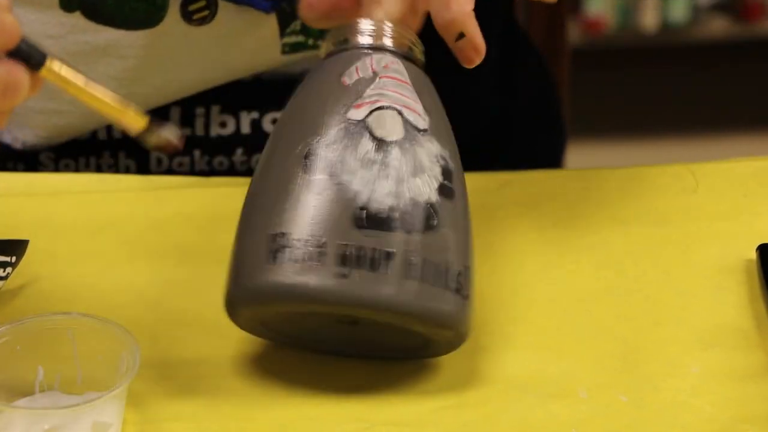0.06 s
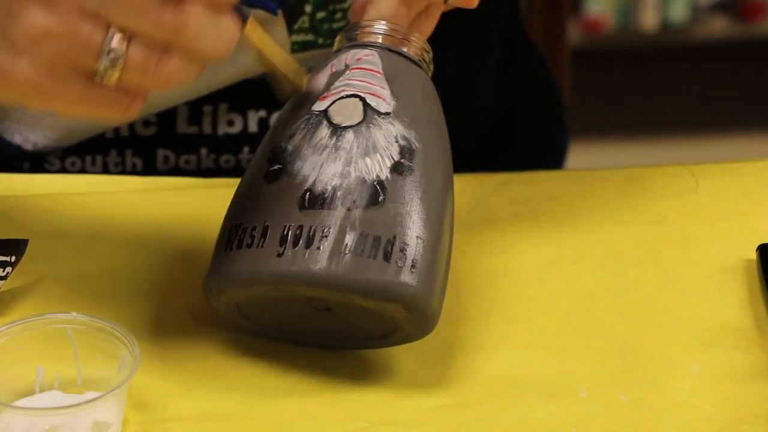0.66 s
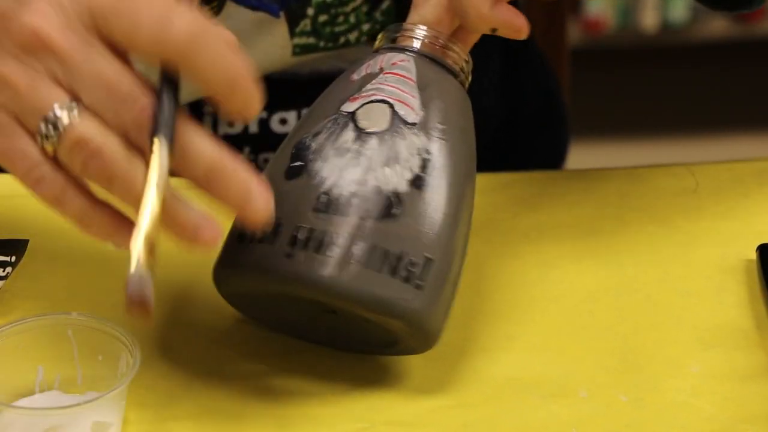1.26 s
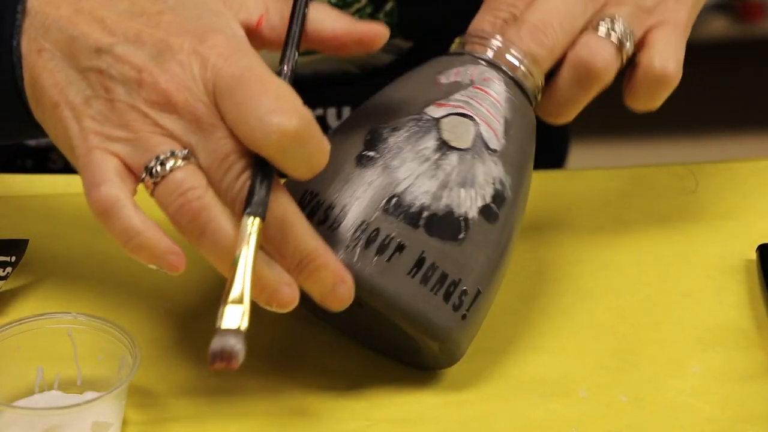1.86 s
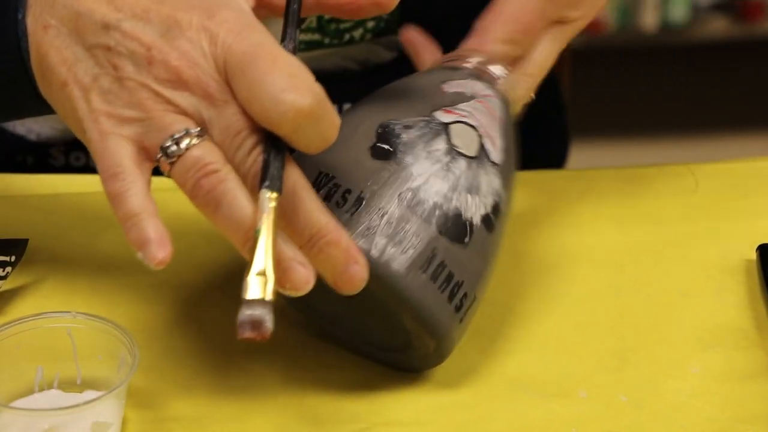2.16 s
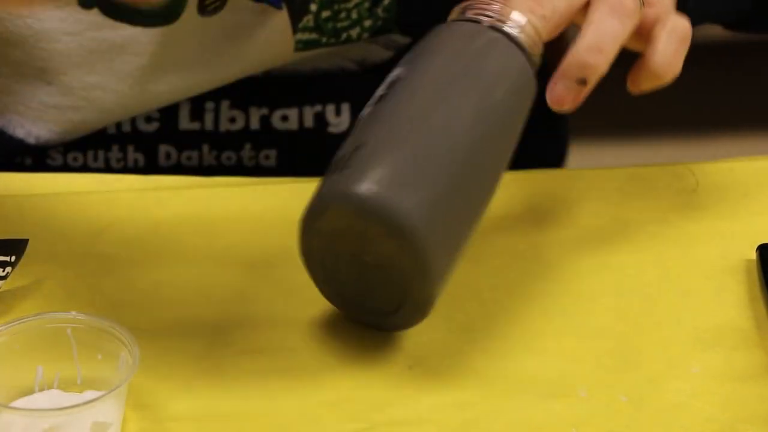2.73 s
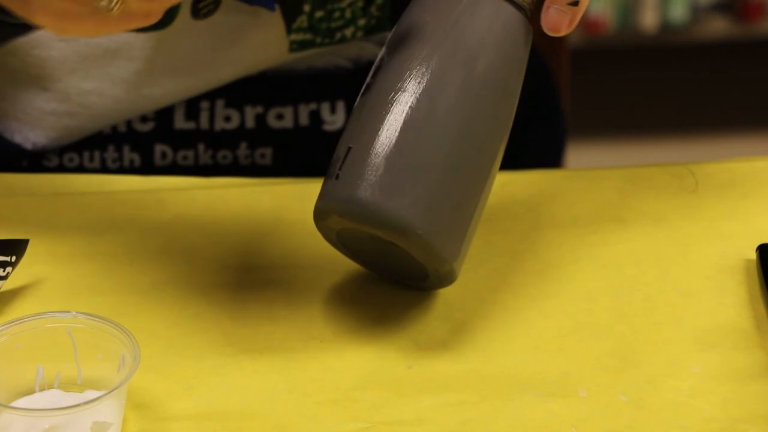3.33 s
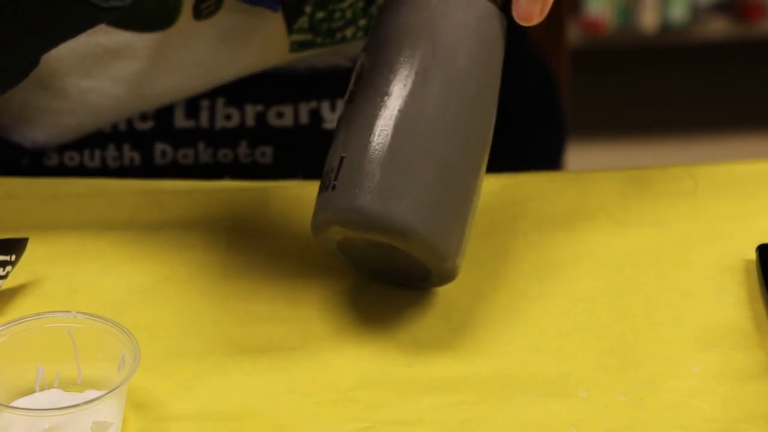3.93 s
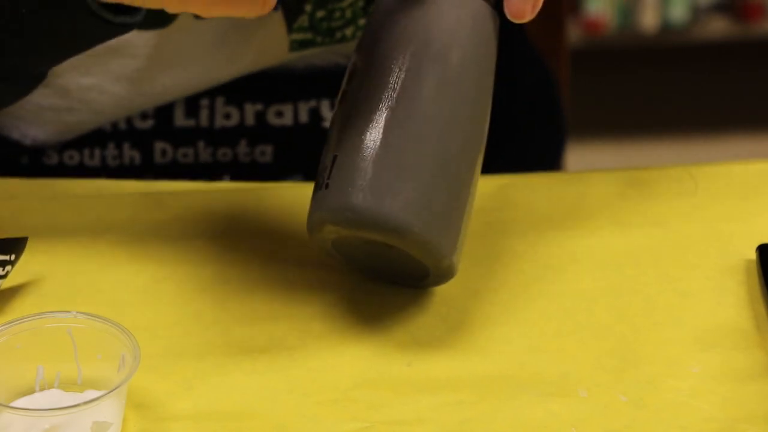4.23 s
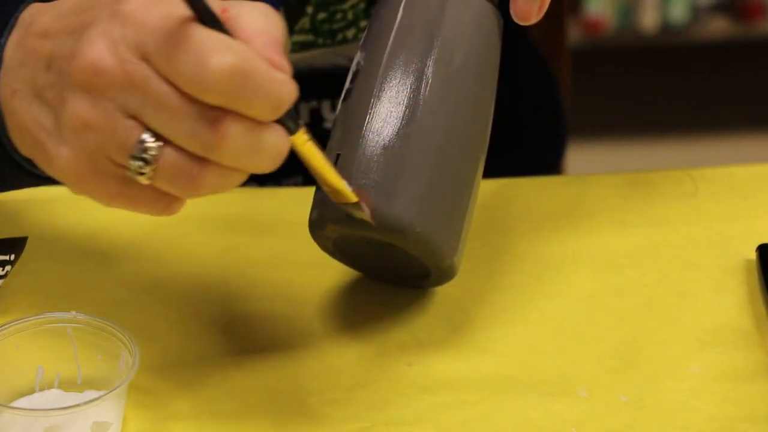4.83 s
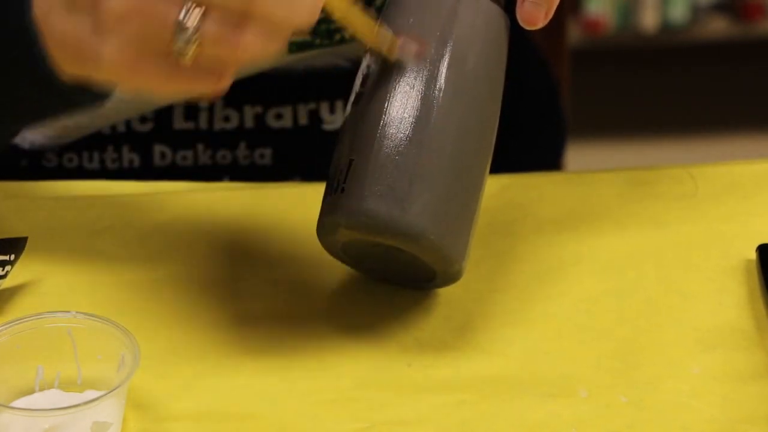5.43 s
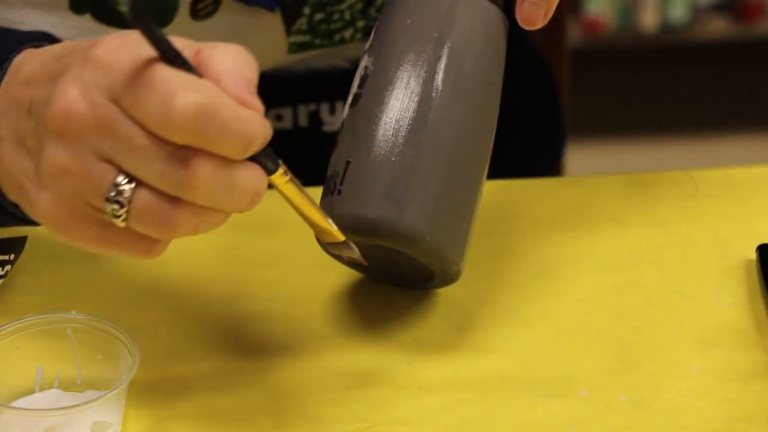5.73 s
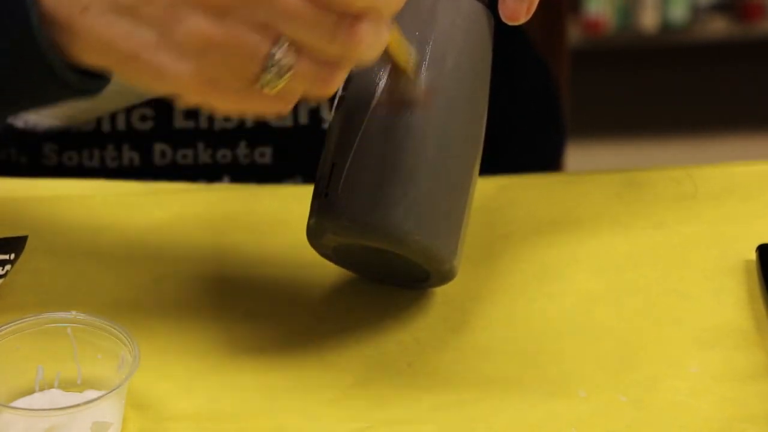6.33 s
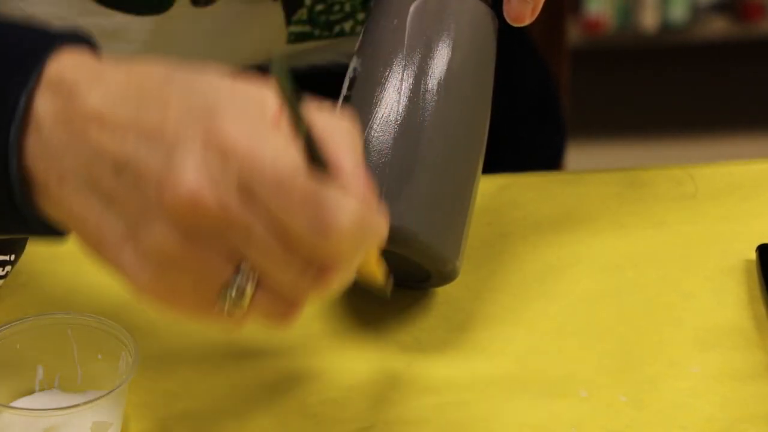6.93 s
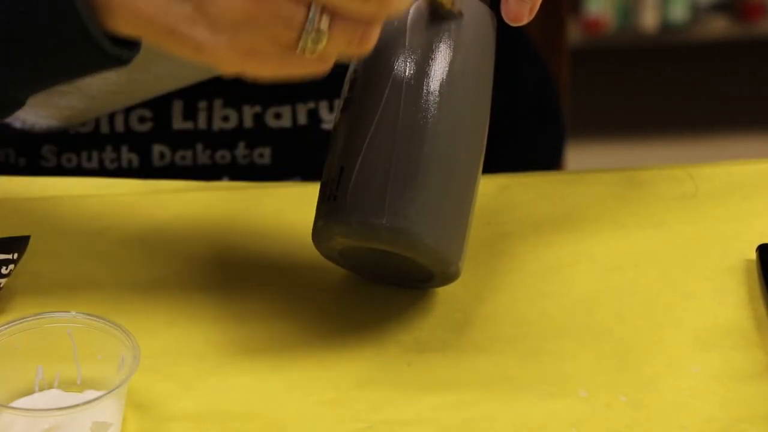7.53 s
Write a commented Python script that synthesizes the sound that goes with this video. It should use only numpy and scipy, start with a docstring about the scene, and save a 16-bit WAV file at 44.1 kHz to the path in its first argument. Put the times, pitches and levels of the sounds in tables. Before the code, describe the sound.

A glass bottle is set down on a paper-covered table with a short, ringing knock. Small ticks touch the glass, the bottle scrapes on the paper, and it is set down twice more. Then a wet brush strokes the glass with a soft hiss, while rougher cloth rubs and snags now and then. It all sounds close, in a quiet room with a low hum and a faint flutter.

```python
"""A quiet room hums throughout, and a small mechanism flutters in it. First a painted glass bottle is
set down on a paper-covered table, making the top ring. Small hard things tick on the glass, and a soft
brush gives two short strokes. The bottle pivots on its heel, scraping the paper, and is set down twice
more. Then the brush strokes on varnish, its bristles hissing over the glass, while a rougher rubbing
of cloth comes and goes, snagging as the arm reaches across."""
import sys
import numpy as np
from scipy import signal
from scipy.fft import rfft, irfft, next_fast_len
from scipy.io import wavfile
from scipy.ndimage import uniform_filter1d, map_coordinates

SR = 44100
rng = np.random.default_rng(int(sys.argv[2]) if len(sys.argv) > 2 else 0)


def generate_wav(signal):
    """Clip the signal to [-1, 1] and save it as 16-bit WAV at the path in sys.argv[1]."""
    frames = np.transpose(np.atleast_2d(signal))
    scaled = np.clip(frames, -1, 1) * 32767
    pcm = np.round(scaled).astype(np.int16)
    wavfile.write(sys.argv[1], SR, pcm)


N = 338989
TIME = np.arange(N) / SR

# The tone colour of each noise. Each row: frequency in Hz, relative level in dB.
AIR_COLOUR = [(15, -32.5), (25, -22), (53, 0.5), (87, -6), (120, -1.5), (200, -5.5), (326, -7.5),
              (516, -13), (607, -8), (677, -12.5), (2110, -21.5), (2550, -21.5), (4870, -25), (9840, -28),
              (16000, -36)]
PAPER_COLOUR = [(900, 0.5), (1800, -4), (2550, -2), (2950, -1.5), (3550, 3.5), (4000, -0.5), (4500, -3),
                (5500, -3), (6400, -5), (7600, -3), (8800, -5), (10000, -10), (13000, -18), (16000, -29)]
BRISTLE_COLOUR = [(300, 1.5), (800, -2), (1300, -6), (1950, 1.5), (2500, -1.5), (3400, 0), (4700, 0.5),
                  (7300, -0.5), (9500, -2), (11500, -7), (13500, -9), (16000, -25)]
SHEEN_COLOUR = [(2000, -18), (5000, -12), (7000, 2), (9500, -6), (11500, -9), (13500, -9), (16000, -17)]   # the bright hiss of the bristle tips
CLOTH_COLOUR = [(150, -9), (400, -5), (780, 2.5), (1400, 3), (1900, -5.5), (2600, -3), (5000, -7),
                (16000, -21)]
SNAG_COLOUR = [(200, -2), (800, 2), (1500, -0.5), (2000, -2), (3000, -3.5), (5000, -1), (9500, -11),
               (13000, -37), (16000, -50)]
# How alike the two ears' noise is. Each row: frequency in Hz, likeness (1 means the same).
ROOM_LIKENESS = [(50, 0.96), (300, 0.76), (700, 0.46), (2000, 0.077), (8000, 0.034)]
CLOSE_LIKENESS = [(200, 1), (1000, 1), (4000, 0.76), (12000, 0.29)]
# The room's hum. Each row: pitch in Hz, level in dB.
HUM_TONES = [(56, -65), (119, -59.5), (157, -66)]
# The bottle knocks on the table. Each row: start in seconds, ring level in dB, ring brightness in dB
# per octave, then the levels of the crack, glassy tick, crunch and boom in dB. All levels are relative.
BOTTLE_KNOCKS = [(0.09, -13.5, 2.8, -16, -26.5, -31.5, -14.5), (0.1187, -18.5, -3, -22, -42, -38, -26),
                 (1.8676, -39.5, -7, -38, -26, -43, -52), (2.8112, -25.5, -1.5, -35, -32, -37, -17),
                 (3.16, -16, -2, -48, -25, -31.5, -14)]
# The tones things ring with. Each row: pitch in Hz, relative level in dB, fade time in seconds.
# A fade time (t60) is how long a sound takes to drop by 60 dB.
TABLE_TONES = [(248, -27, 1), (270, -62, 0.13), (340, -37, 0.23), (316.3, 2, 0.17), (334, -4, 0.21),
               (366, -17.5, 0.5), (432, -14, 0.2), (506, -8.5, 0.089), (568, -11.5, 0.075),
               (614, -12, 0.069), (658, -12.5, 0.096), (719, -8, 0.091), (748, -7, 0.13),
               (761, -21.5, 0.16), (824, -42, .13), (925, -40, 0.11), (970, -24, 0.11), (1090, -30, 0.094),
               (1270, -50, 0.045), (1437, -20.5, 0.072), (2533, -18, 0.034)]   # the table top with the bottle on it
FRAME_TONES = [(120.8, -22.5, 0.35), (158.7, -16.5, 0.2)]   # the deep boom of the table frame
GLASS_TONES = [(1950, -3, .025), (2520, 2, 0.037), (3510, 0, 0.027), (4420, 2, 0.026), (6100, -3, .012),
               (7600, 2, .01)]   # the bottle's wall, damped by the hand
# The room's echo. Each row: frequency in Hz, level in dB, fade time in seconds.
ROOM_ECHO = [(146, -3.5, 0.58), (346, -10, 0.37), (800, -8, 0.4), (2500, -9.5, 0.25), (6000, -11, 0.097),
             (14000, -13, 0.15)]
# Small hard things touch the glass. Each row: start in seconds, relative level in dB, lowest and
# highest frequency in Hz, fade time in seconds.
GLASS_TICKS = [(0.3999, -30.5, 4800, 10600, 0.0083), (1.402, -30, 8000, 13800, 0.012),
               (1.8677, -28, 6260, 9400, 0.011), (2.84, -47, 6500, 10500, 0.062),
               (2.849, -45, 6430, 10500, 0.026)]
# Movements. Each row: start, time speeding up and time slowing down in seconds, then two relative
# levels in dB, for the two sounds named beside the table.
HEEL_DRAGS = [(.47, 0.051, 0.037, -64, -48), (1.32, 0.05, 0.034, -57.5, -46.5),
              (1.895, 0.084, .09, -43.5, -41.5), (1.993, 0.017, 0.044, -59, -44),
              (2.08, 0.06, 0.035, -52, -50), (2.15, 0.032, .1, -53, -51.5),
              (2.25, 0.076, 0.056, -54, -44.5), (2.36, 0.048, .26, -64, -63)]   # paper scrape, table drone
BRUSH_STROKES = [(.66, 0.098, 0.083, -60.5, -68), (.82, 0.057, 0.18, -64, -67), (3.40, .06, 0.15, -56, -62),
                 (3.54, 0.17, 0.49, -62.5, -72), (3.84, 0.47, 0.19, -52, -59),
                 (4.40, .22, 0.31, -50.5, -55.5), (4.99, 0.045, 0.13, -57, -68),
                 (5.25, 0.41, .28, -55, -60), (5.74, 0.14, 0.16, -55.5, -67), (6.02, .03, 0.24, -53.5, -66),
                 (6.17, 0.16, 0.21, -52.5, -60), (6.68, 0.23, 0.074, -45.5, -48.5),
                 (7.59, 0.047, .12, -56, -68)]   # bristle hiss, sheen
CLOTH_RUBS = [(3.88, 0.2, .3, -54, -65), (5.8, 0.16, 0.091, -57.5, -48.5), (6.015, 0.014, 0.44, -48.5, -46),
              (6.28, 0.074, 0.059, -45, -44)]   # cloth hiss, table drone
# Tacky varnish makes the bristles catch. Each row: time in seconds, roughness in dB.
TACKINESS = [(3.8, 2), (4.0, 4), (4.35, 5), (4.5, 0.8)]
# The brush moves along the bottle. Each row: time in seconds, echo strength, lean to the left in dB.
BRUSH_PATH = [(4.2, .02, 5.5), (4.6, .05, 1.4), (6.0, .03, 3), (6.7, .33, 0.1)]
# The cloth snags and lets go. Each row: start in seconds, relative burst level in dB, the burst's fade
# time in seconds, relative snap level in dB.
CLOTH_SNAGS = [(3.984, -47, 0.09, -46), (4.086, -49, .03, -42.5), (4.145, -42.5, 0.022, -44),
               (4.188, -45, 0.019, -49), (4.208, -38, 0.037, -38), (4.238, -43.5, 0.043, -35.5),
               (4.282, -40.5, 0.14, -36), (4.347, -57, 0.044, -40), (5.862, -46, .03, -58),
               (5.932, -41, 0.033, -46), (5.989, -45, .025, -50), (6.024, -40, 0.12, -56),
               (6.032, -39, 0.03, -39), (6.339, -27, 0.099, -28), (6.495, -42, 0.025, -51),
               (6.525, -44.5, 0.032, -58)]


def from_db(db):
    """Turn decibels into a number to multiply a sound by."""
    return np.exp(np.asarray(db) * np.log(10) / 20)


def rms_one(x):
    """Scale a sound to an average power of 1."""
    return x / np.sqrt(np.mean(x ** 2) + 1e-20)


def at_hz(table, hz, column=1):
    """Look up a frequency in a table, gliding between rows on a scale of octaves."""
    table = np.array(table)
    return np.interp(np.log(np.maximum(hz, 1)), np.log(table[:, 0]), table[:, column])


def drift(rate):
    """A random wobble of size about 1 that turns about rate times a second."""
    points = rng.standard_normal(int(N / SR * rate) + 2)
    return rms_one(np.interp(TIME * rate, np.arange(len(points)), points))


def band(x, low_hz, high_hz, order=2):
    """Keep what lies between two frequencies; a higher order cuts more sharply."""
    return signal.sosfilt(signal.butter(order, [low_hz, high_hz], "band", fs=SR, output="sos"), x)


def panned(x, left_db):
    """Make the left side louder than the right by left_db."""
    return x * from_db(np.array([[left_db], [-left_db]]) / 2)


def stereo(mid, side):
    """Make left and right from what they share (mid) and what sets them apart (side)."""
    return mid + side * [[1], [-1]]


def delayed(x, ms):
    """Play one channel ms milliseconds late, or early if ms is negative."""
    return map_coordinates(x, [np.arange(N) - ms * SR / 1000], order=3)


def delay_right(x, ms):
    """Shift only the right ear's sound in time."""
    return np.array([x[0], delayed(x[1], ms)])


def add(out, start_s, sound):
    """Mix a short sound in at start_s."""
    start = round(start_s * SR)
    out[..., start:start + sound.shape[-1]] += sound[..., :N - start]


def hiss(colour, likeness, grain=1.):
    """Stereo noise, roughened by grain (a fast flicker in level) and then given its colour."""
    size = next_fast_len(N)
    hz = np.fft.rfftfreq(size, 1 / SR)
    noise = rng.standard_normal((2, N)) * grain
    mid, side = rfft(noise, size) * from_db(at_hz(colour, hz)) * (hz > 20)
    alike = at_hz(likeness, hz)
    spectrum = stereo(np.sqrt(1 + alike) * mid, np.sqrt(1 - alike) * side)
    return rms_one(irfft(spectrum, size)[:, :N])


def gesture(moves, curve, column=3):
    """Loudness of movements that speed up and come to rest: it follows speed to the power curve."""
    power = np.zeros(N)
    for move in moves:
        start, rise, fall = move[:3]
        inside = slice(*np.searchsorted(TIME, [start, start + rise + fall]))
        angle = np.interp(TIME[inside] - start, [0, rise, rise + fall], [0, np.pi / 2, np.pi])
        speed = np.abs(np.sin(angle))
        power[inside] += (from_db(move[column]) * speed ** curve) ** 2
    return np.sqrt(power)


def air_and_hum():
    """Moving air hisses softly under a low, wavering hum."""
    out = from_db(-51.16) * hiss(AIR_COLOUR, ROOM_LIKENESS)
    for hz, db in HUM_TONES:
        level = from_db(db + 2.0 * drift(rate=2.7))
        out += level * np.sin(2 * np.pi * hz * TIME + 0.71 * drift(rate=6))
    return out


def flutter(per_second=11.0, pitch_hz=605, level_db=-50.5, spread_db=2.4, width_s=0.0042):
    """A small mechanism gives faint, nearly regular pips, each with its own strength and pitch."""
    out, t = np.zeros(N), TIME[:SR // 20]
    swell = np.exp(-.5 * ((t - t.mean()) / width_s) ** 2)
    count = int((N / SR - .1) * per_second)
    for k, (late, strength, detune) in enumerate(rng.standard_normal((count, 3))):
        pip = swell * np.sin(2 * np.pi * pitch_hz * (1 + 0.024 * detune) * t)
        add(out, abs(k / per_second + 0.00306 * late), from_db(level_db + spread_db * strength) * pip)
    return out


def struck(tones, tilt_db=0):
    """One tap sets off fading tones; a positive tilt_db (per octave) favours the high ones."""
    hz, db, t60 = np.array(tones).T[:, :, None]
    t = TIME[:SR // 2]
    level = from_db(db + tilt_db * np.log2(hz / 320))
    return np.sum(level * from_db(-60 * t / t60) * np.sin(2 * np.pi * hz * t), axis=0)


def crack(low_hz, high_hz, t60, width, order=1):
    """Tiny fractures at a contact give a short burst of noise; width spreads it between the ears."""
    t = TIME[:SR // 5]
    mid, side = rng.standard_normal((2, len(t)))
    fade = from_db(-60 * t / t60)
    burst = band(stereo(mid, width * side) * fade, low_hz, high_hz, order)
    return rms_one(burst) * np.sqrt(np.mean(fade ** 2))


def knocks():
    """The bottle cracks and crunches where it lands, rings the table top and makes the frame boom."""
    out = np.zeros((2, N))
    boom = band(struck(FRAME_TONES), low_hz=97, high_hz=175)
    for start, ring_db, tilt_db, crack_db, tick_db, crunch_db, boom_db in BOTTLE_KNOCKS:
        # a flat panel gives off little bass
        ring = band(struck(TABLE_TONES, tilt_db), low_hz=297, high_hz=3460, order=3)
        contact = from_db(crack_db) * crack(low_hz=2180, high_hz=4470, t60=0.0093, width=0.13, order=2)
        tick = from_db(tick_db) * crack(low_hz=6900, high_hz=9850, t60=0.0083, width=0.4, order=2)
        crunch = from_db(crunch_db) * crack(low_hz=600, high_hz=2820, t60=0.071, width=0.47)
        add(out, start, panned(from_db(ring_db) * ring + from_db(boom_db) * boom, left_db=1.5))
        add(out, start, tick + panned(contact + crunch, left_db=-0.5))
    return out


def room(x, echo_s=.0098, build_s=0.011):
    """The room answers with one near echo and a wash of echoes that dies sooner in the treble."""
    t = TIME[:SR * 3 // 4]
    response = np.zeros((2, len(t)))
    edges_hz = np.geomspace(70, 18000, num=9)
    for low, high in zip(edges_hz, edges_hz[1:]):
        hz = np.sqrt(low * high)
        alike = at_hz(ROOM_LIKENESS, hz)
        mid, side = band(rng.standard_normal((2, len(t))), low, high)
        fade = from_db(-60 * t / at_hz(ROOM_ECHO, hz, column=2)) * (1 - np.exp(-t / build_s))
        tail = stereo(np.sqrt((1 + alike) / 2) * mid, np.sqrt((1 - alike) / 2) * side)
        response += from_db(at_hz(ROOM_ECHO, hz)) * tail * fade / np.linalg.norm(fade)
    near_echo = band(signal.unit_impulse(SR // 100), low_hz=1500, high_hz=15000, order=1)
    add(response, echo_s, from_db(-17) * near_echo)
    return signal.fftconvolve(x, response, axes=1)[:, :N]


def ticks():
    """Finger rings and the brush handle touch the glass with short, bright clicks."""
    out = np.zeros((2, N))
    for start, level_db, low_hz, high_hz, t60 in GLASS_TICKS:
        add(out, start, from_db(level_db) * crack(low_hz, high_hz, t60, width=0.27))
    return panned(out, left_db=1.5)


def glass_ring(grain):
    """Rubbing keeps the bottle's wall ringing, a little differently in each ear."""
    mid, side = rng.standard_normal((2, N)) * grain
    friction = stereo(mid, 0.34 * side)
    return rms_one(signal.oaconvolve(friction, struck(GLASS_TONES)[None], axes=1)[:, :N])


def table_drone(grain):
    """Rubbing keeps the table top's tones ringing."""
    ring = band(struck(TABLE_TONES, tilt_db=0.9), low_hz=220, high_hz=1050)
    return rms_one(signal.oaconvolve(rng.standard_normal(N) * grain, ring)[:N])


def drags(curve=1.3):
    """The bottle's heel sticks and slips: the paper hisses, the glass rings and the table drones."""
    slips = from_db(2.6 * drift(rate=300))
    paper = from_db(-1.5) * hiss(PAPER_COLOUR, CLOSE_LIKENESS, slips)
    glass = from_db(-6) * glass_ring(slips)
    drone = gesture(HEEL_DRAGS, curve, column=4) * table_drone(slips)
    return gesture(HEEL_DRAGS, curve) * (paper + glass) + panned(drone, left_db=1.0)


def brush():
    """Wet bristles slide over the glass with a fine hiss, crackling where the varnish is tacky."""
    roughness_db = np.interp(TIME, *np.transpose(TACKINESS))
    grain = from_db(roughness_db * (drift(rate=1300) + 0.81 * drift(rate=130)))
    grain /= np.sqrt(uniform_filter1d(grain ** 2, size=4000))   # rougher, but no louder
    bristles = gesture(BRUSH_STROKES, curve=0.97) * hiss(BRISTLE_COLOUR, CLOSE_LIKENESS, grain)
    # the sheen needs speed, so it swells later and more steeply
    sheen = gesture(BRUSH_STROKES, curve=1.8, column=4) * hiss(SHEEN_COLOUR, CLOSE_LIKENESS, grain)
    return from_db(2.5) * bristles + from_db(1.5) * sheen


def off_glass(x, echo_ms=.72, right_early_ms_per_db=0.28):
    """A quick echo off the bottle colours the sound, which shifts sideways with the brush."""
    times, *columns = np.transpose(BRUSH_PATH)
    strength, left_db = (np.interp(TIME, times, column) for column in columns)
    echo = strength * np.array([delayed(ear, echo_ms) for ear in x])
    coloured = (x - echo) / np.hypot(1, strength)
    leaning = coloured * from_db(np.array([left_db, -left_db]) / 2)
    return delay_right(leaning, ms=-right_early_ms_per_db * left_db)


def rubs(curve=0.81):
    """Cloth catches in uneven clumps, darker and rougher than the brush, and the table drones."""
    grain = from_db(1.8 * drift(rate=900) + 2.1 * drift(rate=130))
    cloth = from_db(2.5) * gesture(CLOTH_RUBS, curve) * hiss(CLOTH_COLOUR, CLOSE_LIKENESS, grain)
    drone = from_db(-9.5) * gesture(CLOTH_RUBS, curve, column=4) * table_drone(grain)
    return panned(cloth + drone, left_db=0.5)


def snags(attack_s=0.0024):
    """Each snag lets go with a sharp snap and a gritty, dying burst."""
    burst_level, snaps = np.zeros(N), np.zeros((2, N))
    for start, burst_db, t60, snap_db in CLOTH_SNAGS:
        age = TIME - start
        rise_then_fall = np.minimum(age / attack_s, -np.log(1000) * age / t60)
        burst_level += from_db(burst_db) * np.exp(np.maximum(rise_then_fall, -20))
        snap = crack(low_hz=2240, high_hz=11200, t60=0.036, width=0.62, order=2)
        add(snaps, start, from_db(snap_db) * snap)
    grain = from_db(2.5 * drift(rate=1500))
    bursts = burst_level * hiss(SNAG_COLOUR, CLOSE_LIKENESS, grain)
    return panned(snaps + bursts, left_db=2.5)


def scene():
    """The work at the table, its echo in the room and the quiet background."""
    work = knocks() + drags() + ticks() + off_glass(brush())
    work += delay_right(rubs() + snags(), ms=0.064)   # the left ear is nearer and hears it first
    return work + room(work) + panned(air_and_hum() + flutter(), left_db=0.75)


def record(dry, cutoff_hz=16200):
    """Cut away the very highest treble steeply."""
    return signal.sosfilt(signal.ellip(10, .1, 80, cutoff_hz, fs=SR, output="sos"), dry)


dry = scene()
out = record(dry)
generate_wav(out)
```